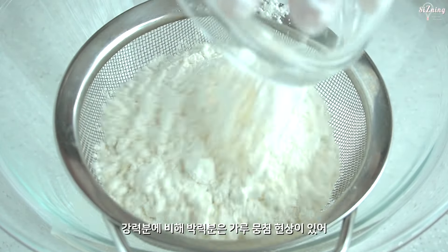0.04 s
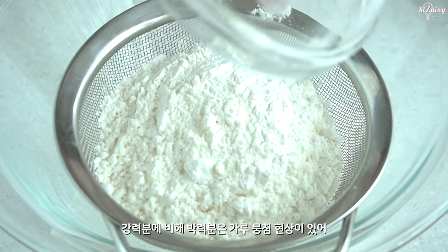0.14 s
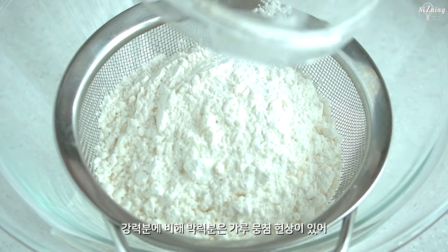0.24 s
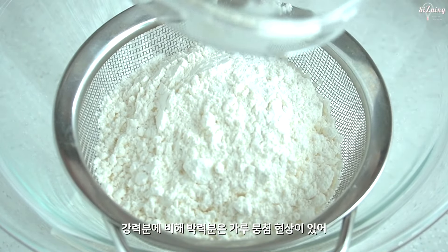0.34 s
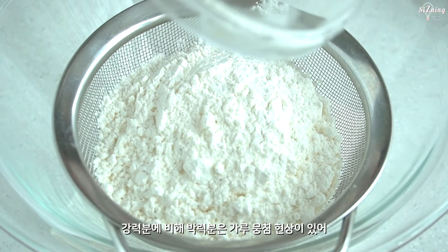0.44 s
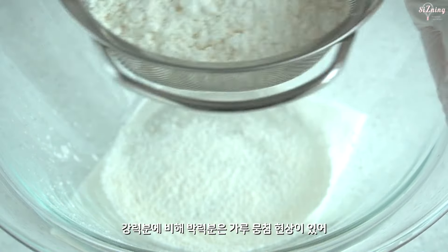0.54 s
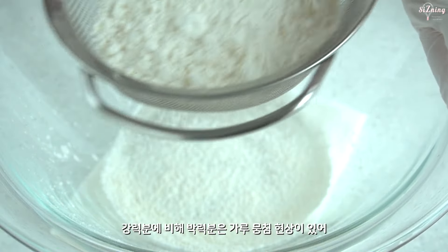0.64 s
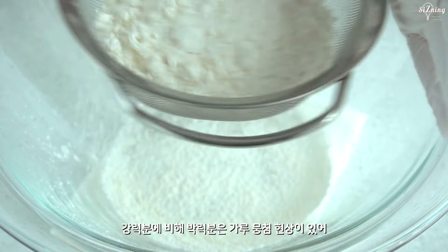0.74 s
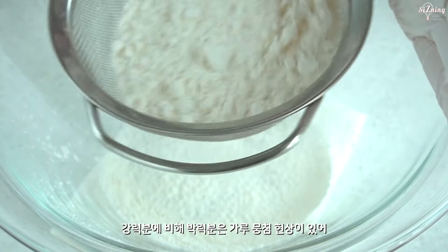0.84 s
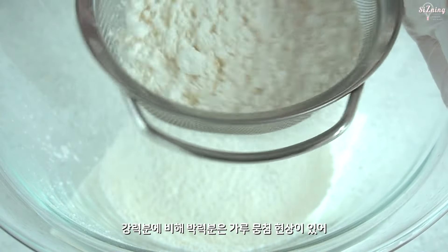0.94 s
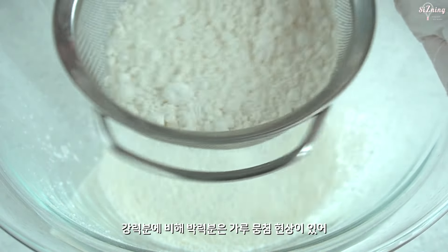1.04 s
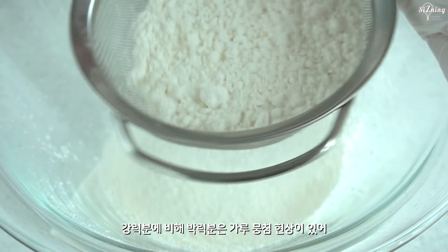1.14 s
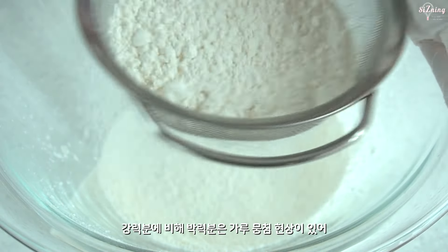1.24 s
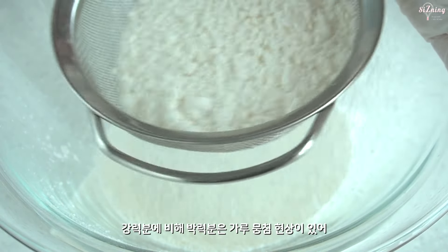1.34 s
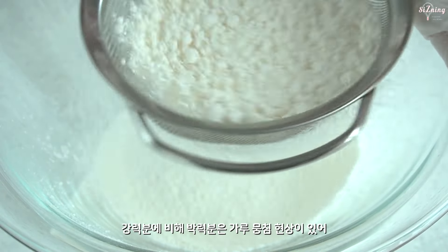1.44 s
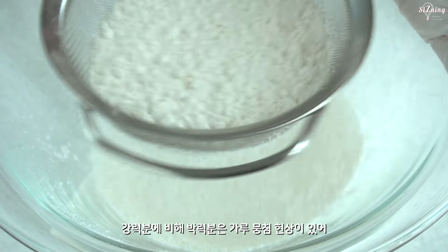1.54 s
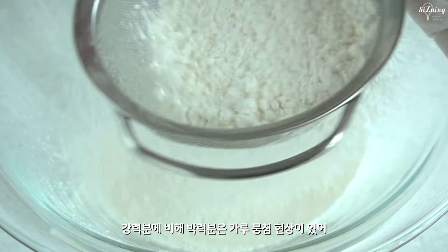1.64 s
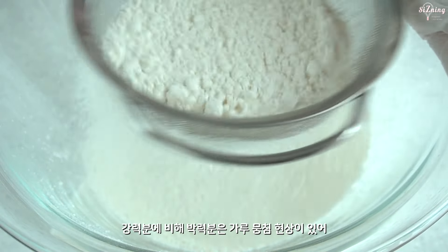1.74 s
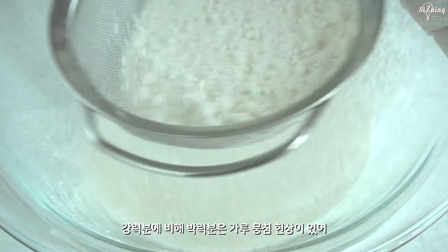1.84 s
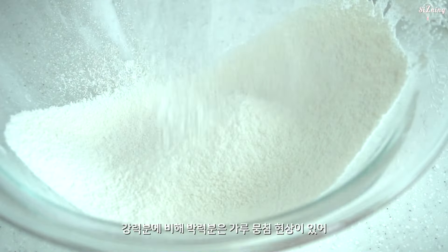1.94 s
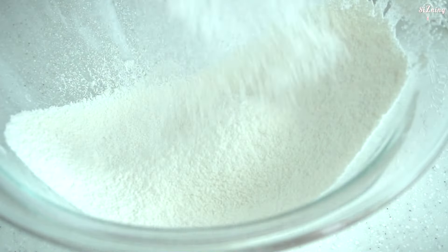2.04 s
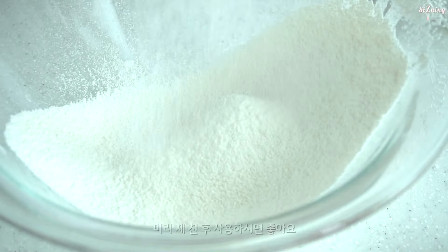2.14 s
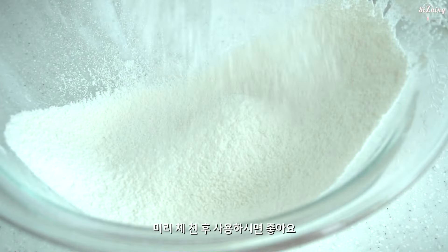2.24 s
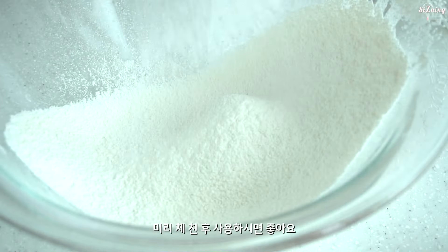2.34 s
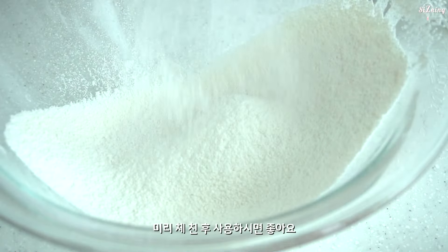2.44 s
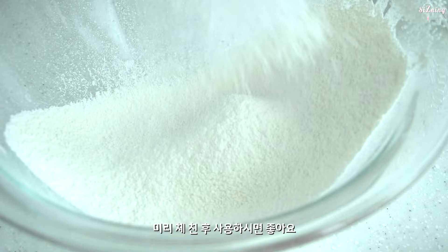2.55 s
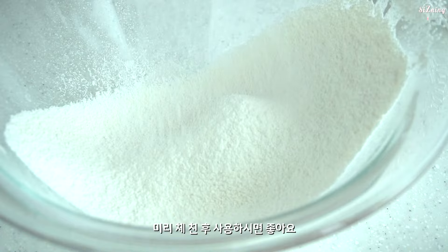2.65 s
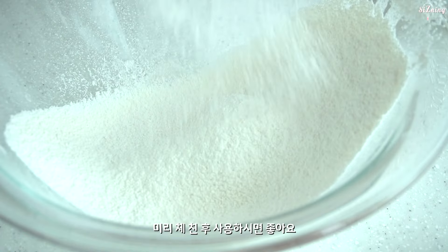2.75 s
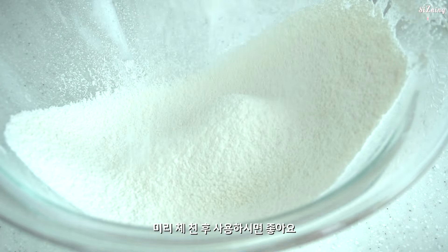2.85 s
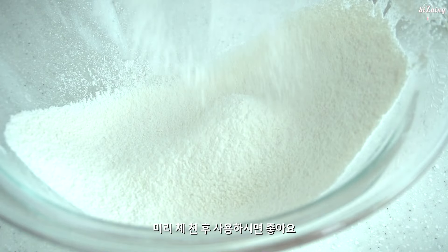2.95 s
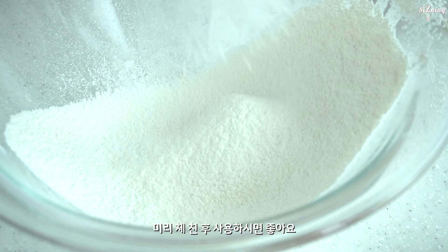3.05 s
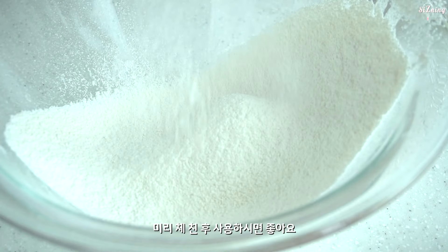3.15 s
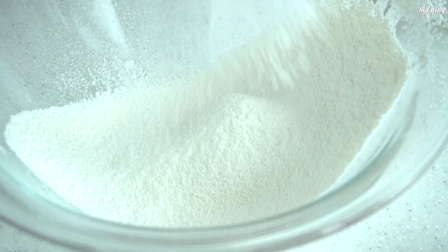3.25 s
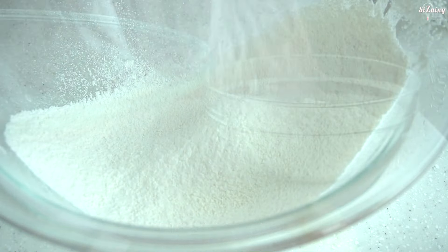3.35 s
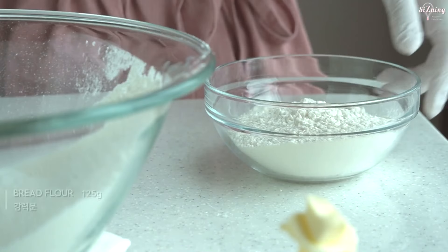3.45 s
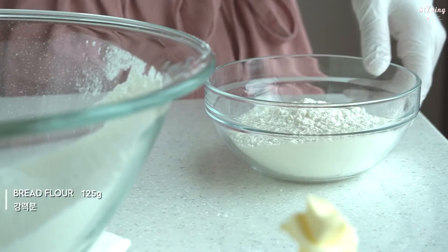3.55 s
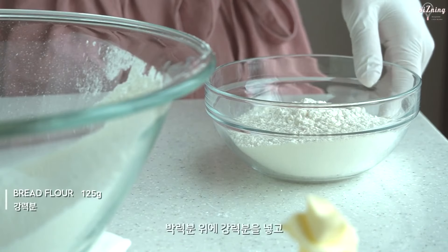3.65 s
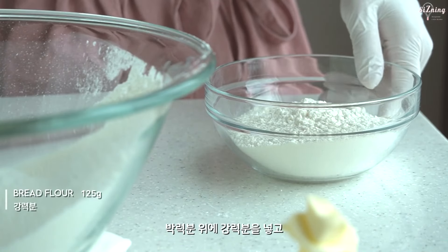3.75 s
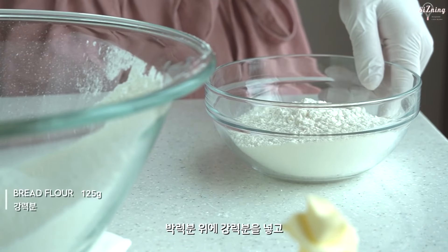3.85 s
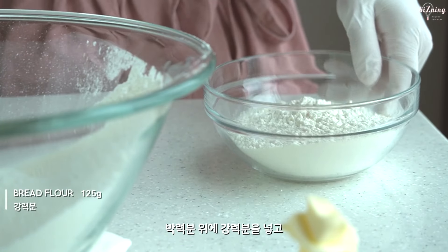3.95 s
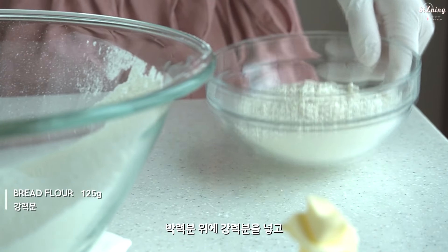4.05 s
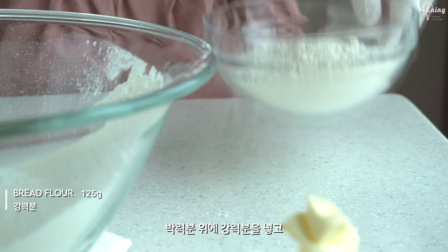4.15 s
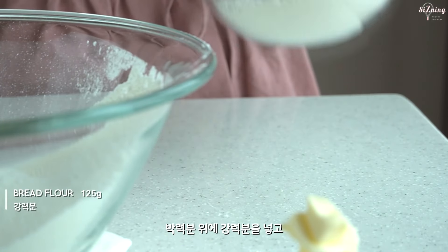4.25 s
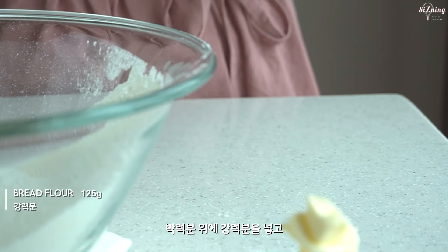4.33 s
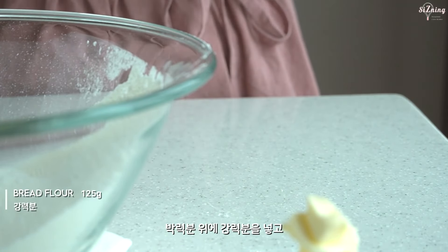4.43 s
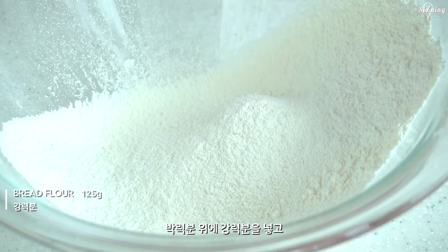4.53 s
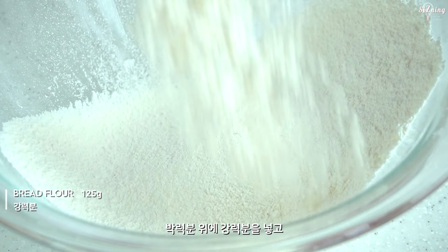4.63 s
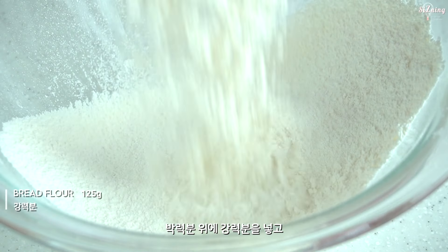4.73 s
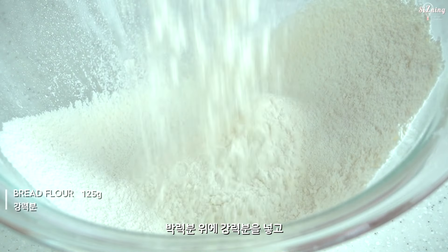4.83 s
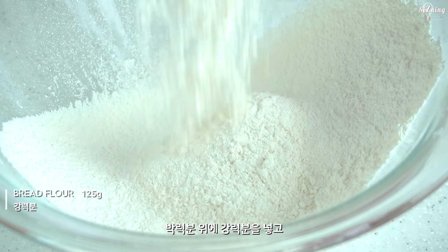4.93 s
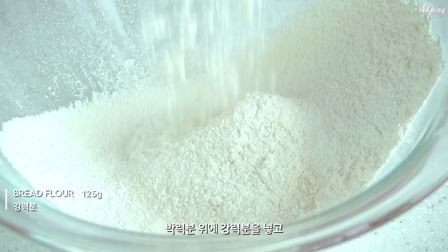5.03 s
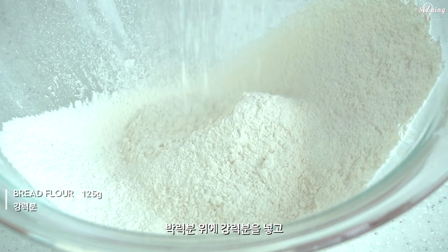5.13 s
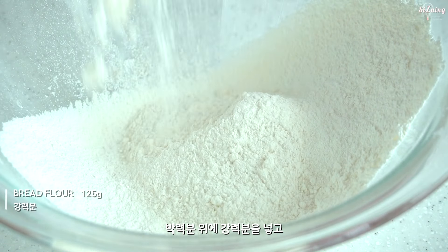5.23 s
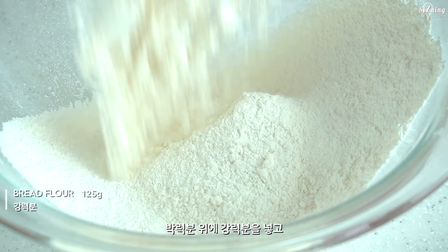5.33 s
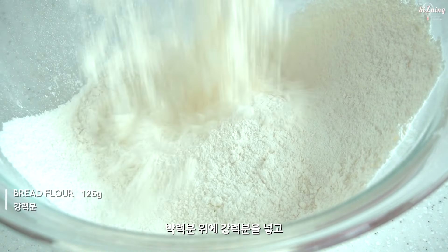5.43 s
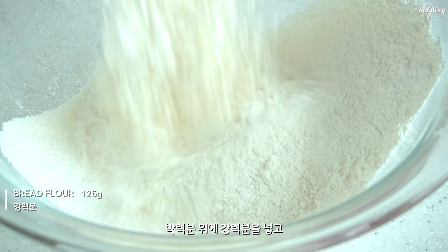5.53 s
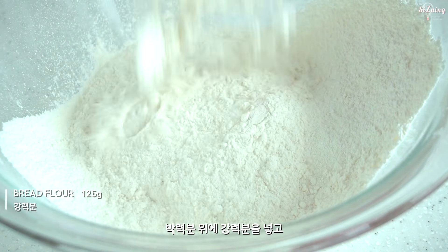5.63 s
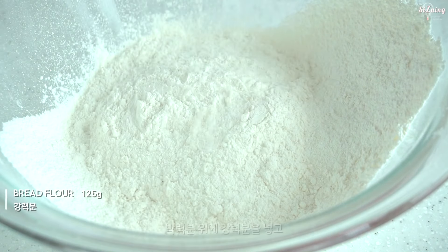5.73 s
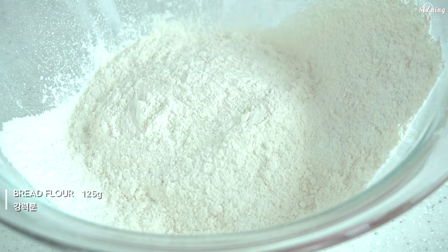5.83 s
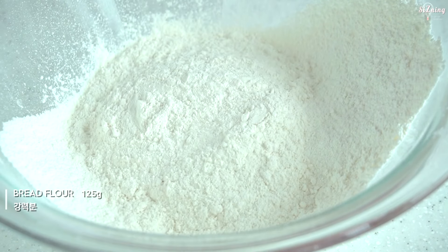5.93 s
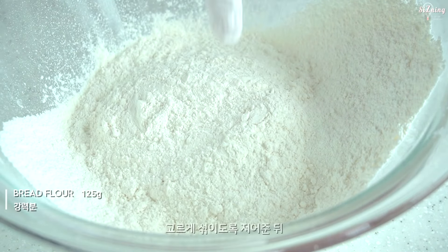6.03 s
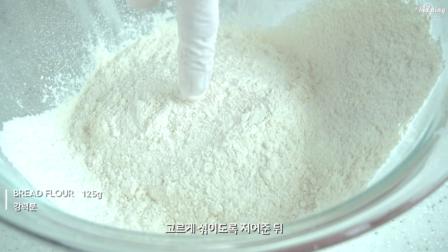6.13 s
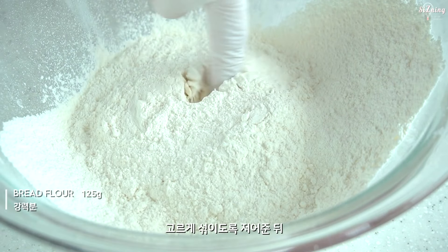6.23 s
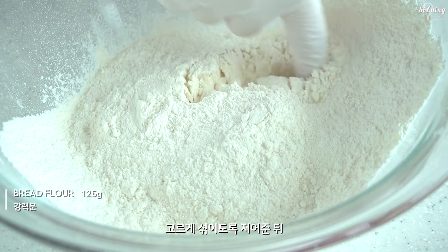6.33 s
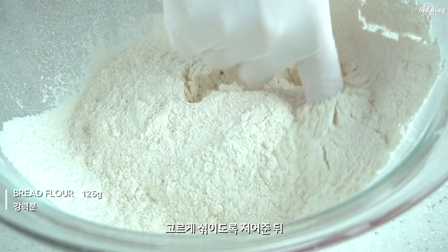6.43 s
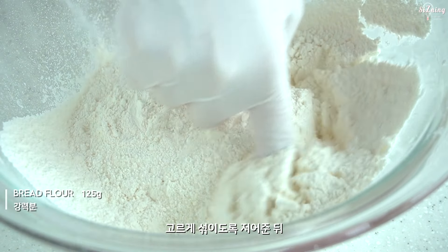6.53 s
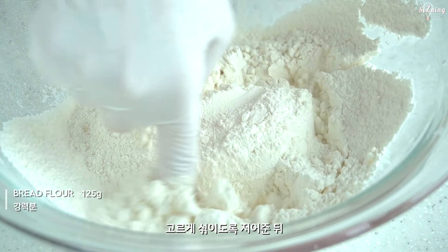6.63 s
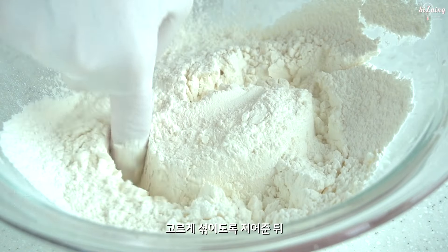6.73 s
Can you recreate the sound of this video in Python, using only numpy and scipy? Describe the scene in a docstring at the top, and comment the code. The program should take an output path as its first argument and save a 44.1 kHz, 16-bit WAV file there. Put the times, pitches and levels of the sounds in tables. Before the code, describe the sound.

A quiet small kitchen heard from close stereo microphones on the counter, with faint low rumble, slight hiss and mains hum throughout. At 0 s clumps of flour land in a steel sieve with a short soft crunchy thump. Around 0.6 s come tiny ticks and a shift of powder. From 0.77 to 3.2 s the sieve knocks a hand fifteen times, evenly, about every 0.17 s: short chattering metallic rattles, dull frame knocks, low counter thuds and gritty flour sliding back over mesh; later knocks sound sharper and stronger. After 3.4 s it is nearly silent. At about 4.0 s a small dish bumps the counter lightly. Soft flour patters at 4.7 s; a brief falling rustle at 5.3 s leads to heavy, muffled, crumbling thumps until 5.75 s. Small ticks at 6 s, then very faint glove rubbing, a barely audible squeak and stirring.

```python
"""Close stereo microphones on a counter in a small kitchen, over a faint house rumble, hiss and mains hum.
Clumps of flour land, first in a steel sieve, as noise, pitched thumps and damped modes. The sieve then
knocks a hand fifteen times: rim chatter and clacks ring its modes and sway the counter, while grains of
noise make the heap sliding back over the mesh. A glove rubs, a small dish is lifted with bumps, its flour
slips with a falling rustle, clumps drop heavily into a glass bowl, and a gloved finger stirs."""
import sys
import numpy as np
from scipy import signal
from scipy.fft import rfft, irfft
from scipy.io import wavfile

SR = 44100
rng = np.random.default_rng(int(sys.argv[2]) if len(sys.argv) > 2 else 0)


def store_wav(level_fs):
    """Save 16-bit WAV to argv[1]."""
    pcm = np.round(np.clip(np.atleast_2d(level_fs), -1, 1) * 32767)
    wavfile.write(sys.argv[1], SR, pcm.T.astype(np.int16))


N = 299042
TIME = np.arange(N) / SR
SHORT = TIME[:SR // 5]  # clock of one short event

# Room air. Each row: frequency in Hz, relative level in dB.
AIR_SPECTRUM = [(12, -17), (22, 0.5), (29, -4), (65, -7), (110, -16), (250, -19.5), (450, -23.5),
                (750, -27.5), (1600, -34.5), (4200, -41), (16000, -47.5)]
# Likeness of the air at the two microphones. Each row: frequency in Hz, correlation from 0 to 1.
AIR_LIKENESS = [(30, 0), (60, 0), (130, 0.43), (640, 0.36), (1400, 0.49), (3100, 0.23), (15000, 0.13)]
# Tail of the kitchen. Each row: frequency in Hz, t60 in s.
KITCHEN_DECAY = [(100, 0.66), (1000, 0.24), (4000, 0.3), (15000, 0.18)]

# Clumps of flour landing, first in the sieve, later in the bowl. Each row: landing in s, relative thump and
# patter level in dB, thump pitch in Hz, relative crunch level in dB, settling time in s.
CLUMP_FALLS = [(0.0, -46, 330, -51.5, 0.0088), (0.031, -40.5, 356, -52.5, 0.025),
               (4.696, -46.5, 302, -68, 0.06), (4.711, -46, 240, -66.5, 0.1),
               (4.831, -53.5, 266, -76, 0.071), (5.383, -36.5, 313, -63, 0.02),
               (5.411, -35, 225, -50, .022), (5.438, -35.5, 180, -52, 0.03), (5.493, -37, 210, -57, 0.0089),
               (5.529, -36.5, 165, -48, 0.066), (5.569, -40.5, 222, -45.5, 0.052),
               (5.686, -52, 290, -44, 0.005), (5.7, -36.5, 196, -50.5, 0.022),
               (5.739, -49, 223, -52, 0.016)]
# Patter on soft flour. Each row: frequency in Hz, relative level in dB.
THUMP_SPECTRUM = [(30, -22), (115, -12), (155, 0), (250, 10), (380, -3.5), (500, -8), (1000, -14),
                  (1600, -22), (2300, -29), (5000, -42)]
# Flour packing together. Each row: frequency in Hz, relative level in dB.
CRUNCH_SPECTRUM = [(400, -13), (1200, 5.5), (2000, -3), (3500, -4), (5300, -9.5), (7500, -30.5),
                   (10000, -21), (16000, -53)]
# Damped ring under the landing flour. Each row: frequency in Hz, t60 in s,
# relative level in dB before the heavy fall, the same from the heavy fall on.
LANDING_MODES = [(163, .05, -21, -10), (234, 0.056, -6.5, -4), (302, 0.017, -6, -24),
                 (433, 0.021, -9, -10.5), (618, 0.038, -5.5, -12), (690, 0.022, -23, -14.5),
                 (856, 0.025, -46, -11.5), (1267, 0.048, -9, -12.5), (1377, 0.037, -28, -24)]

# Flour shifting as the sieve is raised and stopped. Each row: centre in s, relative level in dB, half length in s.
MESH_SHIFTS = [(0.585, -57, 0.0033), (0.629, -58.5, 0.048), (0.641, -48.5, 0.0048), (3.334, -62, 0.017),
               (3.357, -58, 0.003)]
# Flour scraping the wires. Each row: frequency in Hz, relative level in dB.
MESH_SPECTRUM = [(300, -31.5), (1000, -0.5), (2200, -5.5), (3200, 6.5), (4200, 8.5), (6000, 4), (10000, 3),
                 (13000, -4), (16000, -13)]
# Small ticks, scuffs and scrapes. Each row: start in s, relative level in dB, pitch in Hz,
# left-right balance in dB, fall time in s.
SMALL_TICKS = [(0.6088, -38, 4630, 4, 0.0015), (0.613, -40.5, 5040, -10, 0.0014),
               (1.36, -52, 8000, 2, 0.0011), (4.0565, -61, 6600, -14, 0.0035),
               (4.076, -50, 6450, -11, 0.0034), (4.2786, -62.5, 3850, -3, 0.0057),
               (4.295, -66.5, 2170, 0, .02), (4.307, -60, 5300, 4, 0.014), (5.9512, -43, 9700, 3, 0.0011),
               (6.0934, -40.5, 6470, -6, 0.0021), (6.6777, -62, 4640, 4, 0.0027),
               (6.71, -62, 4230, 5, 0.003)]
# Knocks on the hand. Each row: start in s, relative rattle level in dB, time to its crest in s, then
# relative levels in dB of the clack, the dull knock of the frame and the slide of the heap.
SIEVE_KNOCKS = [(0.774, -45.5, 0.012, -33, -44.5, -59.5), (0.931, -43, .011, -39, -45, -58),
                (1.103, -41.5, .01, -41, -43.5, -56.5), (1.267, -38, .011, -24, -36, -54),
                (1.430, -38.5, 0.0092, -7.5, -40, -48.5), (1.609, -37, 0.0084, -18, -41, -45),
                (1.776, -39, 0.0097, -26, -35.5, -48.5), (1.969, -35.5, .0047, -12, -37, -48),
                (2.142, -36.5, 0.0038, -26, -34, -45.5), (2.316, -32.5, .0044, -6.5, -42.5, -49),
                (2.487, -34.5, .005, -10, -40, -52), (2.665, -31.5, .005, -31, -38.5, -49),
                (2.841, -35.5, 0.0054, -15, -39, -48), (3.019, -32, 0.0047, -10, -40.5, -46.5),
                (3.194, -33, 0.0043, -34, -35.5, -53.5)]
# Frame, rim and mesh. Each row: frequency in Hz, t60 in s, relative level in dB in the first seven knocks,
# relative level in dB in the last eight.
SIEVE_MODES = [(190, 0.076, -24, -8.5), (274, 0.023, -5.5, -16.5), (484, 0.04, -12, -10.5),
               (653, 0.053, -8, -17.5), (932, 0.036, -22, -14.5), (1286, 0.023, -8.5, -9.5),
               (1862, 0.049, -12.5, -23), (2337, 0.028, -15.5, -8.5), (3260, 0.045, -25, -31),
               (3265, 0.013, 1.5, -3), (3826, 0.062, -8, -24), (3776, 0.038, 0.5, -13),
               (4076, 0.022, -5.5, -14), (4600, 0.038, -14, -12), (5150, 0.028, -7.5, -56)]
# Chattering rim. Each row: frequency in Hz, relative level in dB.
RATTLE_SPECTRUM = [(400, -30.5), (1500, -8), (2700, 2.5), (3600, 15.5), (5000, 7), (7000, 2.5),
                   (10000, -0.5), (13000, -9.5), (16000, -14)]
# Dull frame. Each row: frequency in Hz, relative level in dB.
BODY_SPECTRUM = [(60, -10.5), (100, -1), (150, 8.5), (250, 1), (400, -10), (640, -7.5), (1000, -4.5),
                 (1450, -14.5), (2000, -19), (4000, -52.5)]
# Flour the knocks throw against the mesh. Each row: time in s, relative level in dB.
THROWN_LEVEL = [(.78, -44), (1.43, -52.5), (1.78, -51), (2.2, -46.5), (3.2, -46)]
# Thrown flour. Each row: frequency in Hz, relative level in dB.
SPRAY_SPECTRUM = [(1000, -16), (3000, -9), (5000, 6), (7500, -3.5), (10000, 4.5), (13000, -5.5),
                  (16000, -24)]
# Sway of the counter and the stand on it. Each row: frequency in Hz, t60 in s, signed share left, share right.
COUNTER_MODES = [(21.6, 0.28, 0.19, -0.3), (34.4, 0.16, 0.9, -0.16), (81, 0.084, 0.21, -0.53)]

# Glove on glass and flour. Each row: peak in s, relative level in dB, rise time in s, fall time in s.
GLOVE_RUBS = [(3.93, -74.5, .015, 0.011), (4.06, -73.5, 0.049, .03), (4.31, -68, 0.054, 0.027),
              (4.499, -65.5, 0.052, 0.0078), (5.25, -74.5, 0.26, 0.4), (5.955, -68.5, 0.011, 0.29),
              (6.70, -77, .12, 0.047)]
# Rubbing glove. Each row: frequency in Hz, relative level in dB.
GLOVE_SPECTRUM = [(800, -11), (2500, 3), (4500, 8.5), (6500, 6.5), (10500, 7), (13000, 1), (16000, -14)]
# The small dish nudging the counter. Each row: start in s, relative level in dB, contact time in s.
DISH_BUMPS = [(3.973, -26.5, 0.0011), (3.990, -16.5, 0.0021), (3.994, -20, 0.0014), (4.021, -26, 0.002),
              (4.046, -25.5, 0.002)]
# Small dish. Each row: frequency in Hz, relative level in dB, t60 in s.
DISH_MODES = [(223.4, -10, 0.11), (262.7, -4.5, 0.13), (370, -8, 0.042), (596, -8.5, 0.023),
              (760, -11, 0.051), (1160, -7, 0.049)]
# Flour slipping along the tilted dish. Each row: time in s, relative level in dB, centre in Hz.
DISH_SLIP = [(5.05, -87, 14900), (5.15, -85, 14300), (5.281, -83, 13300), (5.315, -63, 8900),
             (5.345, -72.5, 7600), (5.38, -97, 6500)]
# Glove squeaking on glass. Each row: frequency in Hz, relative level in dB, t60 in s.
SQUEAK_MODES = [(2640, -80, .05), (4097, -75, 0.074), (5790, -77, 0.059)]

RING_CHANGE_S = 1.92  # the sieve's ring changes from here
HEAVY_FROM_S = 5.2  # the heavy fall comes after this


def gain_of(db):
    """Amplitude ratio of a level in dB."""
    return 10 ** (np.asarray(db) / 20)


def evened(x):
    """The signal scaled to rms 1."""
    return x / np.sqrt(np.mean(x ** 2) + 1e-20)


def read(points, hz):
    """A curve joined by straight lines on a log-frequency axis."""
    f, value = np.transpose(points)
    return np.interp(np.log(hz + 1), np.log(f + 1), value)


def level(s, db):
    """A dB curve as a gain, silent outside its span."""
    return gain_of(np.interp(TIME, s, db)) * (TIME >= s[0]) * (TIME <= s[-1])


def burst(s, fall):
    """A sudden start that dies away exponentially, within one short event."""
    return (SHORT >= s) * np.exp(-abs(SHORT - s) / fall)


def swell(t, s, half):
    """A smooth bell-shaped rise and fall around one moment."""
    return np.exp(-.5 * np.minimum(((t - s) / half) ** 2, 100))


def stroke(s, rise, fall):
    """A gain that climbs to 1 at one moment and dies away after it."""
    return np.exp(-np.minimum(np.maximum((s - TIME) / rise, (TIME - s) / fall), 30))


def half_wave_push(contact):
    """The smooth force of one contact, of unit sum."""
    pulse = np.sin(np.pi * np.clip(SHORT / contact, 0, 1)) ** 2
    return pulse / pulse.sum()


def colour(x, points, size=4096):
    """A causal (minimum-phase) filter of unit energy with the given spectrum."""
    log_gain = np.log(gain_of(read(points, abs(np.fft.fftfreq(size, 1 / SR)))))
    taps = np.fft.ifft(np.exp(np.conj(signal.hilbert(log_gain)))).real
    return signal.oaconvolve(x, taps / np.linalg.norm(taps))[:len(x)]


def decaying_sine(hz, t60):
    """One free mode, falling 60 dB in t60 seconds."""
    return np.sin(2 * np.pi * hz * SHORT) * np.exp(-np.log(1000) * SHORT / t60)


def ring(x, modes):
    """Decaying modes, each with the energy of its dB value, excited by a signal."""
    response = np.zeros(len(SHORT))
    for hz, db, t60 in modes:
        tone = decaying_sine(hz, t60)
        response += gain_of(db) * tone / np.linalg.norm(tone)
    return signal.oaconvolve(x, response)[:len(x)]


def ring_changing(x, modes, change):
    """Modes whose strengths change at one moment."""
    hz, t60, before_db, after_db = np.transpose(modes)
    before = ring(x * (TIME < change), zip(hz, before_db, t60))
    after = ring(x * (TIME >= change), zip(hz, after_db, t60))
    return before + after


def grains(per_s, spread_db, size=N):
    """Random tiny impacts of uneven size, rms 1."""
    strength = gain_of(spread_db * np.minimum(rng.exponential(1, size), 3))
    return evened(strength * rng.choice([-1, 1], size) * (rng.random(size) < per_s / SR))


def clumping(depth_db, rate_hz, size=N):
    """Grains come in bunches: a gain of rms 1 that wanders at up to about the given rate."""
    wander = evened(signal.lfilter(*signal.butter(2, rate_hz, fs=SR), rng.standard_normal(size)))
    return evened(gain_of(depth_db * np.clip(wander, -2, 2)))


def high_pass(x, hz, order=2):
    """The signal without its lows."""
    return signal.lfilter(*signal.butter(order, hz, 'high', fs=SR), x)


def add(mix, s, sound):
    """Lay a sound into the mix from a given second, cut at its end."""
    part = mix[..., round(s * SR):][..., :sound.shape[-1]]
    part += sound[..., :part.shape[-1]]


def place(x, pan_db):
    """Left-right balance of a near source; positive is left."""
    return x * gain_of([[pan_db / 2], [-pan_db / 2]])


def spread(x, pan_db, width, corner_hz, size=160, lowest_hz=500):
    """A random short diffuse spread between left and right, absent in the bass, strongest in the treble."""
    taps = rng.standard_normal(size) * np.exp(-np.linspace(0, 2, size)) * (np.arange(size) > size // 8)
    side = signal.oaconvolve(x, taps / np.linalg.norm(taps))[:N]
    middle = high_pass(side, min(lowest_hz, SR / 3))
    treble = high_pass(side, min(corner_hz, SR / 3))
    return place(x, pan_db) + np.array([[1], [-1]]) * (width * middle + treble)


def room_tone(air_db=-63):
    """Steady low rumble of the house and a faint hiss: shaped noise, partly alike at both microphones."""
    hz = np.fft.rfftfreq(N, 1 / SR)
    a, b = rfft(rng.standard_normal((2, N)))
    same = np.clip(read(AIR_LIKENESS, hz), -1, 1)
    right = same * a + np.sqrt(1 - same ** 2) * b
    air = irfft(np.array([a, right]) * gain_of(read(AIR_SPECTRUM, hz)), N)
    return gain_of(air_db) * air / air.mean(0).std()


def hum(hz=50.5, rms_db=-64):
    """A mains appliance hums low in the kitchen, a steady sine leaning left."""
    return place(gain_of(rms_db) * np.sqrt(2) * np.sin(2 * np.pi * hz * TIME), pan_db=4.0)


def landing_clumps(soft_db=-7.0, ring_db=-5.0, thin_db=-7, lump_db=8, dust_db=-69.5):
    """Each clump thumps as it lands, crunches as it packs, and crumbles into a patter with a dull ring."""
    forerun_s = 0.017  # loose powder lands just ahead of a clump: its rise time
    crunch_share = 0.95  # fall time of the crunch as a share of the settling time
    lump_cycles = 2.13  # fall time of the thump in cycles
    lumps, crunch_power = np.zeros((2, N))
    # a thin stream ahead of the heavy fall
    patter_power = (gain_of(dust_db) * swell(TIME, s=5.17, half=0.28)) ** 2
    for s, db, hz, crunch_db, settle in CLUMP_FALLS:
        soft_onset = 1 - burst(0, 1 / (2 * hz))
        thump = np.sin(2 * np.pi * hz * SHORT) * burst(0, lump_cycles / hz) * soft_onset
        add(lumps, s, gain_of(db + lump_db) * thump)
        patter_power += (gain_of(db) * stroke(s, forerun_s, settle)) ** 2
        crunch_power += (gain_of(crunch_db) * stroke(s, rise=0.01, fall=crunch_share * settle)) ** 2
    patter = np.sqrt(patter_power) * grains(per_s=2700, spread_db=1.0)
    weight = gain_of(soft_db + thin_db * (TIME < HEAVY_FROM_S))  # softer before the heavy fall
    ringing = gain_of(ring_db) * ring_changing(patter, LANDING_MODES, HEAVY_FROM_S)
    dull = colour(weight * patter, THUMP_SPECTRUM) + ringing
    packing = np.sqrt(crunch_power) * clumping(depth_db=4.5, rate_hz=190) * grains(per_s=8200, spread_db=3.5)
    crisp = colour(packing, CRUNCH_SPECTRUM)
    return spread(dull + lumps + crisp, pan_db=3.0, width=0.33, corner_hz=10900)


def sliding(ring_db=-15, scrape_db=-1.54, heap_db=3):
    """After each knock the heap slides back over the wires and powder trickles through."""
    wait_s, lag = 0.014, 3.32  # later after a slower knock: delay = wait + lag x crest time
    rise_s, fall_s = 0.0084, 0.01  # it lands quickly and settles more slowly
    # the trickle weakens from knock to knock
    trickle_db, trickle_db_per_s, trickle_fall_s = -64.5, -2.5, 0.099
    flow = np.zeros(N)
    for s, _, crest, *_, slide_db in SIEVE_KNOCKS:
        flow += gain_of(slide_db + heap_db) * stroke(s + wait_s + lag * crest, rise_s, fall_s)
        powder_db = trickle_db + trickle_db_per_s * (s - SIEVE_KNOCKS[0][0])
        flow += gain_of(powder_db) * stroke(s, crest, trickle_fall_s)
    for s, db, half in MESH_SHIFTS:
        flow += gain_of(db) * swell(TIME, s, half)
    scrape = flow * grains(per_s=11000, spread_db=5.0) * clumping(depth_db=1.5, rate_hz=160)
    wires = gain_of(scrape_db) * colour(scrape, MESH_SPECTRUM)
    wires += gain_of(ring_db) * ring_changing(scrape, SIEVE_MODES, RING_CHANGE_S)
    return spread(wires, pan_db=1.0, width=0.25, corner_hz=9000)


def ticks(skirt_db=-23):
    """Small ticks, scuffs and scrapes: each a short noise burst peaked around one pitch."""
    out = np.zeros((2, N))
    for s, db, hz, pan_db, fall in SMALL_TICKS:
        shape = [(hz / 4, 2 * skirt_db), (hz / 2, skirt_db), (hz, 0), (hz * 2, skirt_db)]
        noise = gain_of(db) * burst(0, fall) * rng.standard_normal(len(SHORT))
        add(out, s, place(colour(noise, shape), pan_db))
    return out


def sieve(first_touch=0.53, linger=0.65, ring_db=-8, buzz_db=-2.5, body_db=-3, crack_db=-8,
          touch_db=8, grip_db=6.5, detune=0.012, spray_lag=1.98):
    """The rim touches the hand, chatters up to a crest where it clacks, and throws flour against the mesh."""
    out, size = np.zeros(N), len(SHORT)
    hz, t60, early_db, late_db = np.transpose(SIEVE_MODES)
    for s, rattle_db, crest, clack_db, frame_db, _ in SIEVE_KNOCKS:
        climb = (SHORT < crest) * (first_touch + (1 - first_touch) * (SHORT / crest) ** 2)
        press = climb + burst(crest, linger * crest)
        chatter = gain_of(rattle_db) * press * grains(per_s=5500, spread_db=2.5, size=size)
        chatter *= clumping(depth_db=0.5, rate_hz=430, size=size)
        clack = np.zeros(size)
        clack[0] = gain_of(rattle_db + touch_db)
        clack[round(crest * SR)] = gain_of(clack_db)
        # each knock meets the rim at a slightly different spot, which shifts its modes
        mode_db = (early_db if s < RING_CHANGE_S else late_db) + grip_db * rng.uniform(-0.78, 1, len(hz))
        modes = zip(hz * (1 + detune * rng.standard_normal(len(hz))), mode_db, t60)
        bright = high_pass(clack, 3000, order=1)  # a hard, light contact hardly moves the low modes
        buzz = gain_of(buzz_db) * colour(chatter + gain_of(crack_db) * clack, RATTLE_SPECTRUM)
        steel = buzz + gain_of(ring_db) * ring(chatter + bright, modes)
        dull = gain_of(frame_db + body_db) * press * grains(per_s=4000, spread_db=2.5, size=size)
        thrown = gain_of(np.interp(s, *np.transpose(THROWN_LEVEL))) * swell(SHORT, spray_lag * crest, crest / 2)
        thrown *= grains(per_s=5100, spread_db=0.0, size=size)
        add(out, s, steel + colour(dull, BODY_SPECTRUM) + colour(thrown, SPRAY_SPECTRUM))
    return spread(out, pan_db=2.5, width=0.33, corner_hz=8900)


def thuds(contact=1.49):
    """Each knock is a soft push that rocks the counter and the microphones standing on it."""
    # a slower knock pushes harder: dB at the usual crest time, dB per doubling of it
    usual_crest_s, push_db, db_per_doubling = 0.007, -23.5, 2
    push = np.zeros(N)
    for s, _, crest, *_ in SIEVE_KNOCKS:
        db = push_db + db_per_doubling * np.log2(crest / usual_crest_s)
        add(push, s, gain_of(db) * half_wave_push(contact * crest))
    sway = np.zeros((2, len(SHORT)))
    for hz, t60, left, right in COUNTER_MODES:
        sway += np.array([[left], [right]]) * decaying_sine(hz, t60)
    return signal.oaconvolve(push[None], sway, axes=1)[:, :N]


def glove(stir_db=-82):
    """The glove rubs on glass and flour, and crumbs break as the finger stirs: bunched grains of noise."""
    pressure = sum(gain_of(db) * stroke(s, rise, fall) for s, db, rise, fall in GLOVE_RUBS)
    rub = pressure * grains(per_s=4000, spread_db=4) * clumping(depth_db=2.5, rate_hz=15)
    crumbs = gain_of(stir_db) * swell(TIME, s=6.4, half=0.28) * grains(per_s=90, spread_db=4)
    return spread(colour(rub + crumbs, GLOVE_SPECTRUM), pan_db=0.2, width=0.51, corner_hz=10100)


def dish(slip_width_hz=2600):
    """The small dish bumps the counter; tilted, it lets its flour slip with a falling rustle."""
    blows = np.zeros(N)
    for s, db, contact in DISH_BUMPS:
        add(blows, s, gain_of(db) * half_wave_push(contact))
    bump = high_pass(ring(blows, DISH_MODES), 170)  # a small dish radiates no bass
    s, db, hz = np.transpose(DISH_SLIP)
    hiss = evened(signal.lfilter(*signal.butter(2, slip_width_hz / 2, fs=SR), rng.standard_normal(N)))
    # low noise times a gliding carrier makes a noise band that glides
    carrier = np.sqrt(2) * np.cos(2 * np.pi * np.cumsum(np.interp(TIME, s, hz)) / SR)
    swish = level(s, db) * clumping(depth_db=7.5, rate_hz=130) * hiss * carrier
    return place(bump, pan_db=-7.0) + spread(swish, pan_db=15, width=.3, corner_hz=12000)


def squeak():
    """The glove sticks and slips on the glass for a moment: grains ring a few high modes."""
    slips = swell(TIME, s=6.26, half=0.038) * grains(per_s=2700, spread_db=2.0)
    return place(ring(slips, SQUEAK_MODES), pan_db=3.0)


def kitchen(x, size=256):
    """A short diffuse tail, each band dying at its own speed."""
    late_noise = rng.standard_normal((2, SR // 2)) * (TIME[:SR // 2] > .006)
    hz, t, z = signal.stft(late_noise, SR, nperseg=size)
    decay = np.exp(-np.log(1000) * t / read(KITCHEN_DECAY, hz)[:, None])
    tail = signal.istft(z * decay, SR, nperseg=size)[1]
    return signal.oaconvolve(x, tail / np.linalg.norm(tail[0]), axes=1)[:, :N]


def scene(knock_room_db=-17, handling_room_db=-15):
    """The flour, sieve and dish close by, with the kitchen behind them."""
    handling = landing_clumps() + ticks() + glove() + dish() + squeak()
    sifting = sliding() + sieve()
    echo = kitchen(gain_of(knock_room_db) * sifting + gain_of(handling_room_db) * handling)
    return room_tone() + hum() + handling + sifting + thuds() + echo


def record(dry, edge_hz=16100):
    """The band limit of the recorder: a steep low-pass."""
    low_pass = signal.firwin(511, edge_hz, window=("kaiser", 9), fs=SR)
    return signal.oaconvolve(dry, low_pass[None], "same", axes=1)


dry = scene()
out = record(dry)
store_wav(out)
```